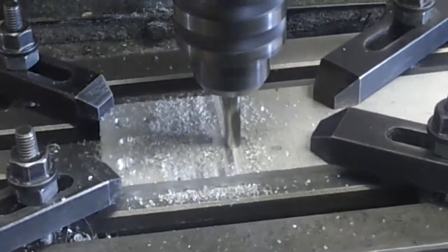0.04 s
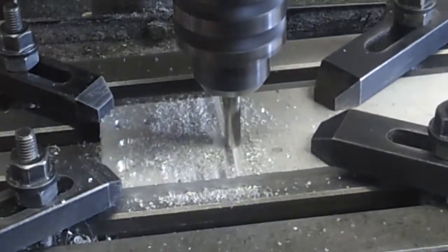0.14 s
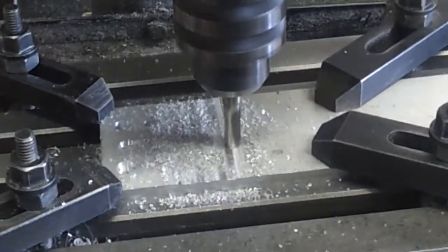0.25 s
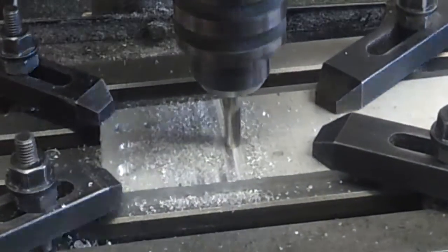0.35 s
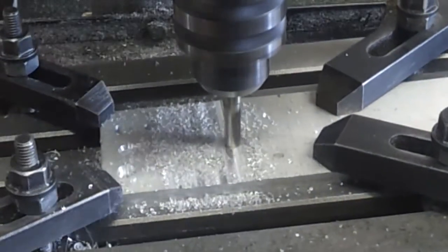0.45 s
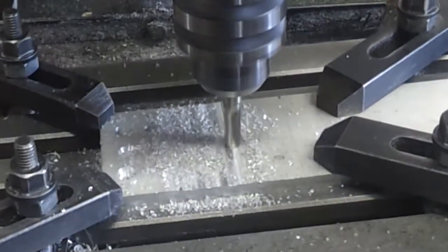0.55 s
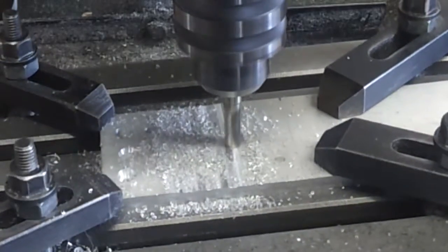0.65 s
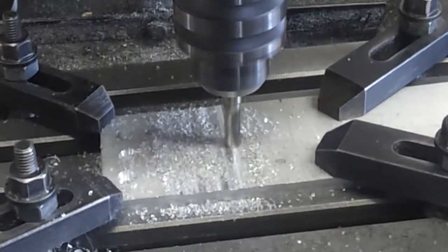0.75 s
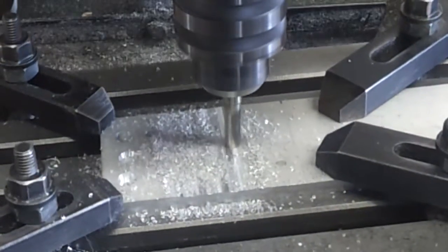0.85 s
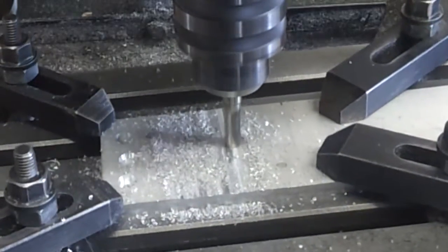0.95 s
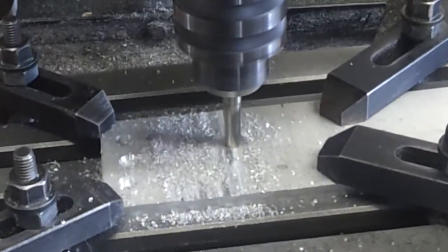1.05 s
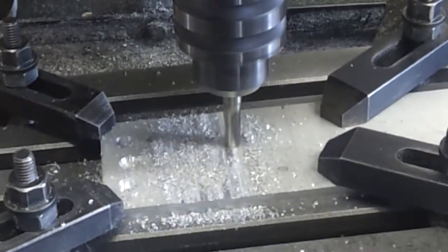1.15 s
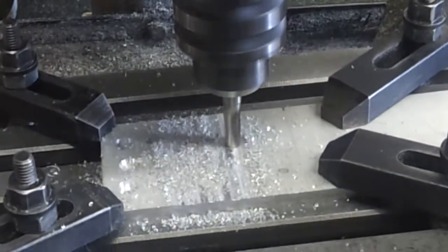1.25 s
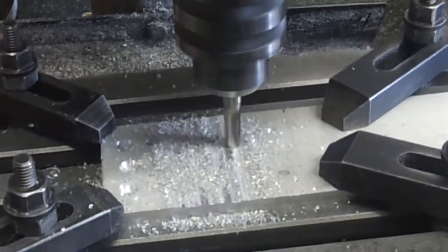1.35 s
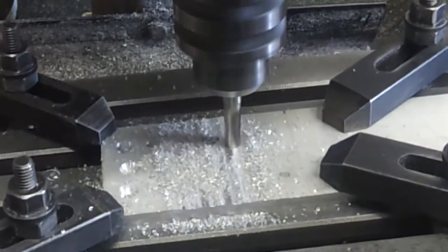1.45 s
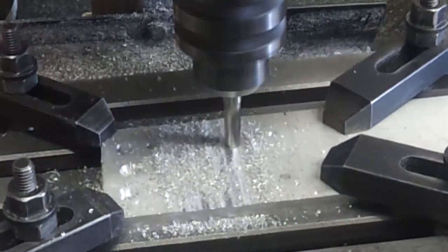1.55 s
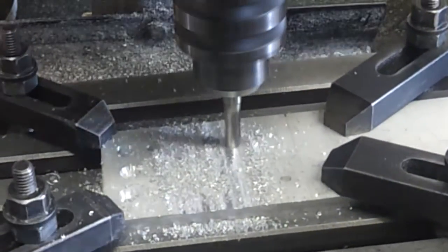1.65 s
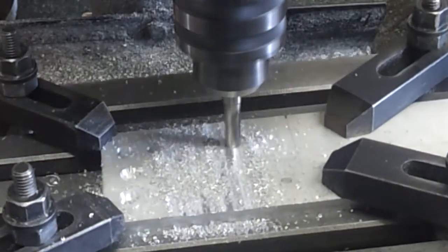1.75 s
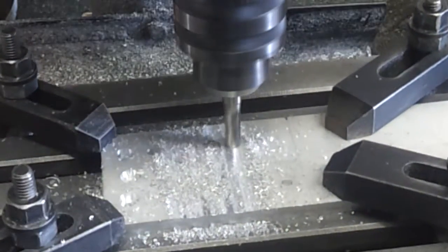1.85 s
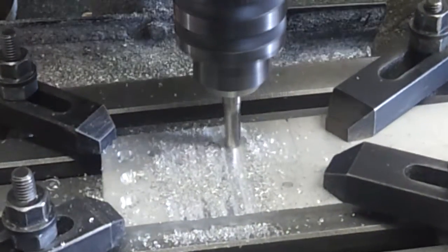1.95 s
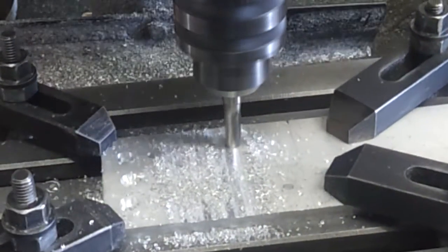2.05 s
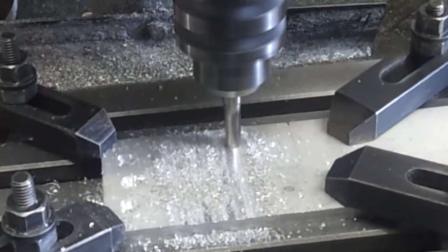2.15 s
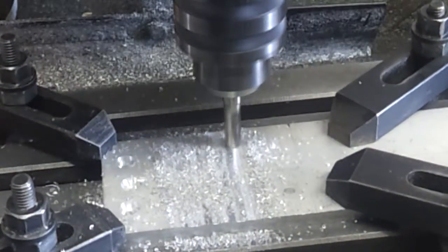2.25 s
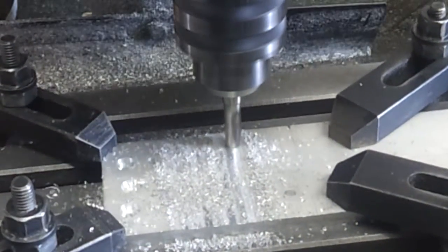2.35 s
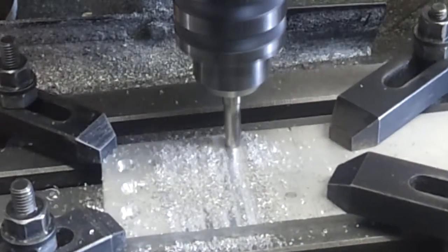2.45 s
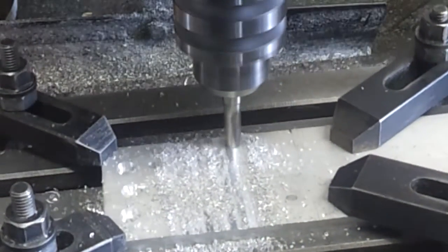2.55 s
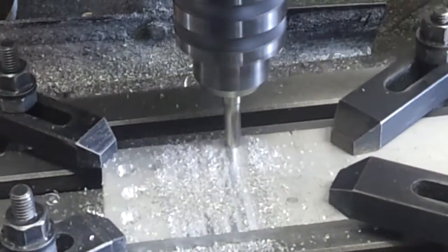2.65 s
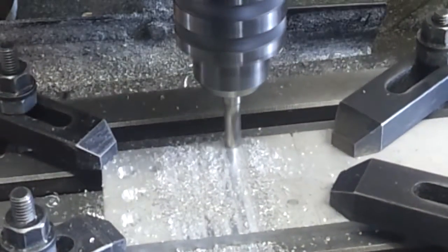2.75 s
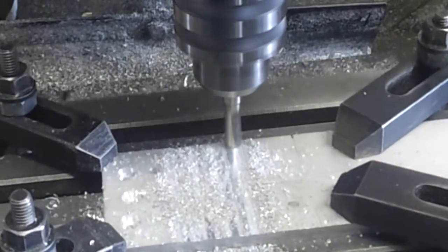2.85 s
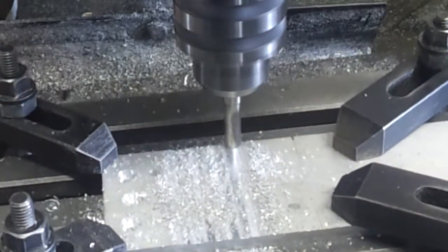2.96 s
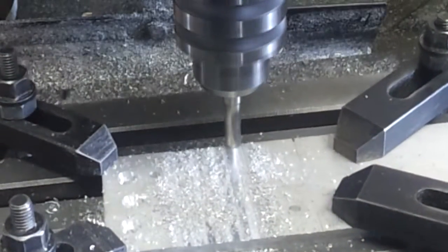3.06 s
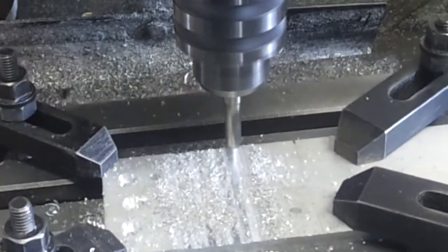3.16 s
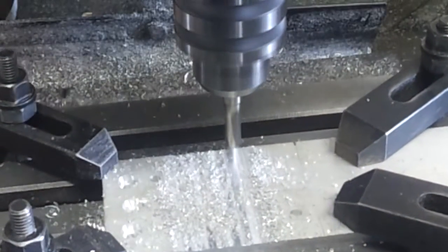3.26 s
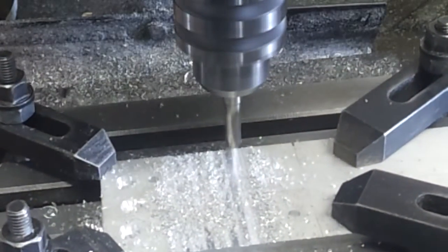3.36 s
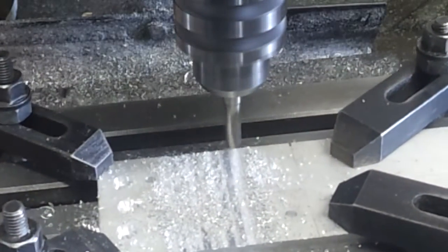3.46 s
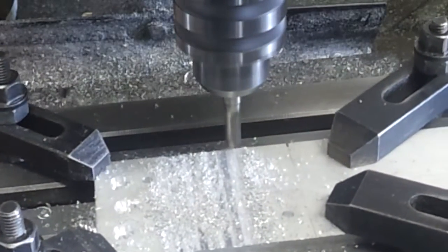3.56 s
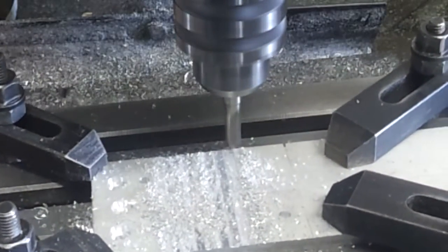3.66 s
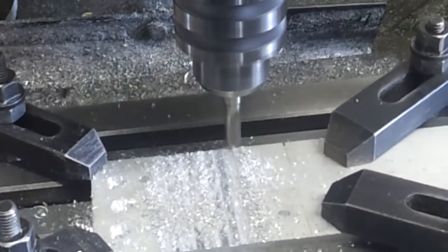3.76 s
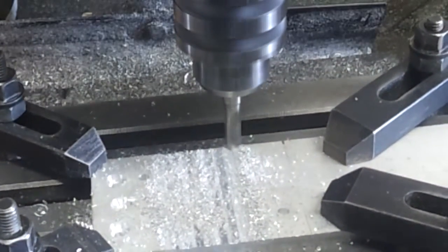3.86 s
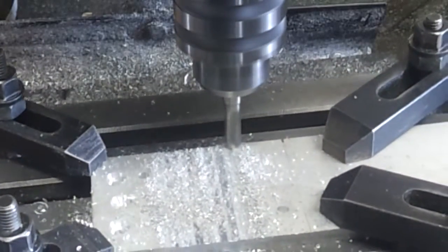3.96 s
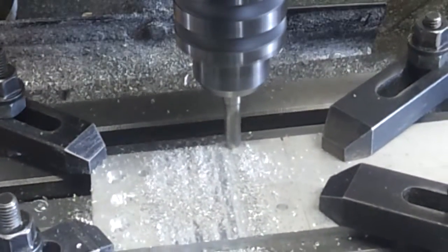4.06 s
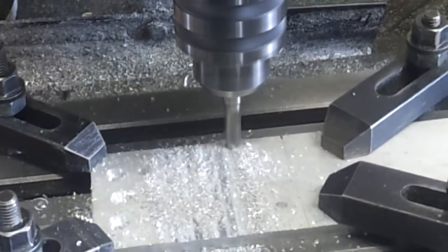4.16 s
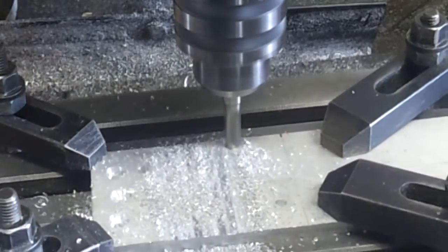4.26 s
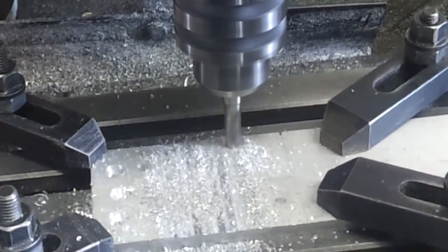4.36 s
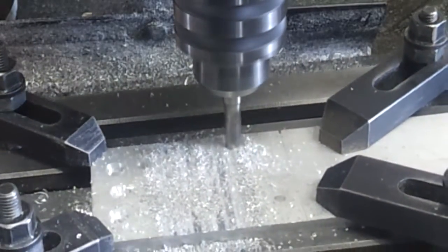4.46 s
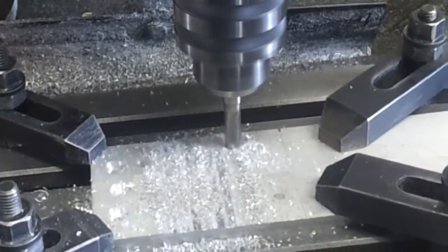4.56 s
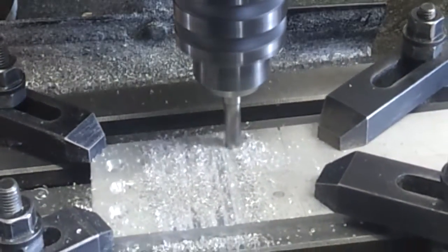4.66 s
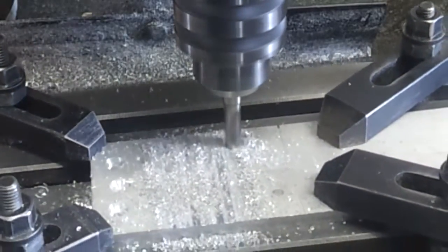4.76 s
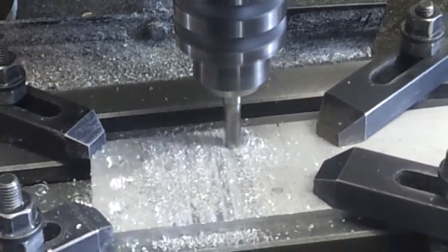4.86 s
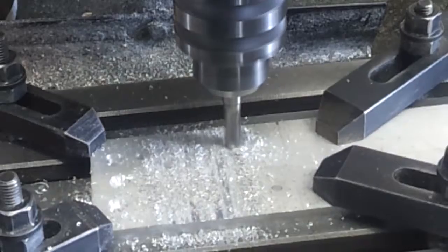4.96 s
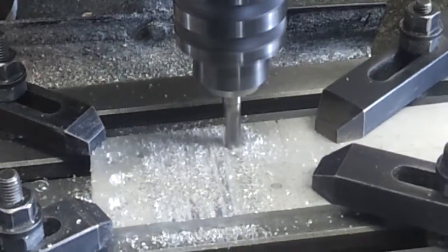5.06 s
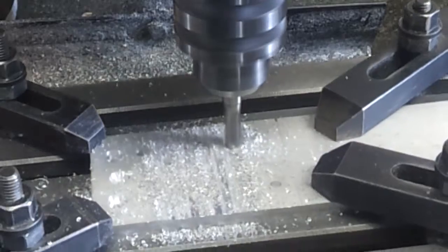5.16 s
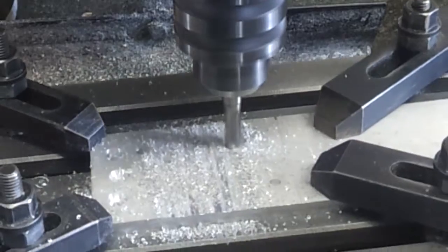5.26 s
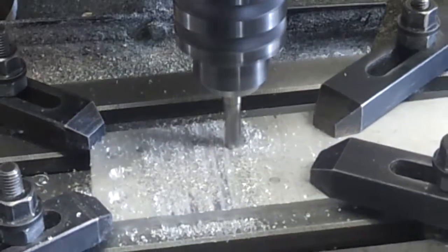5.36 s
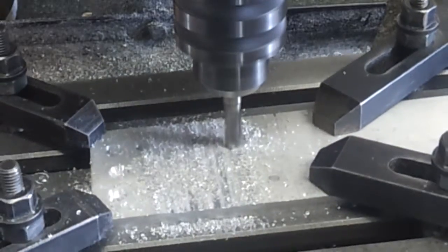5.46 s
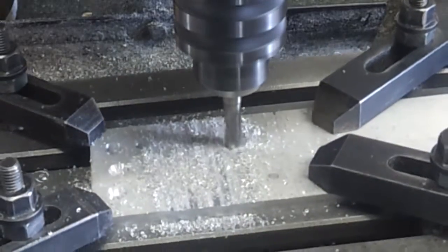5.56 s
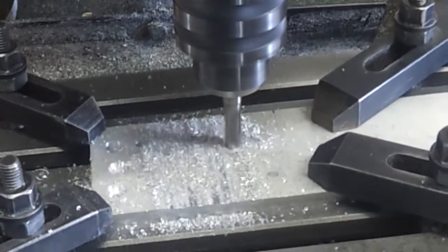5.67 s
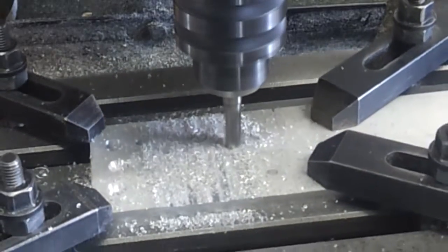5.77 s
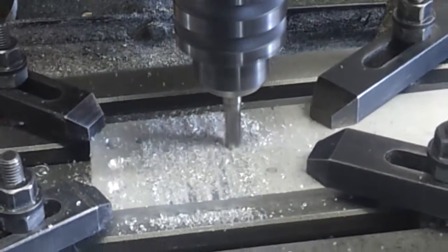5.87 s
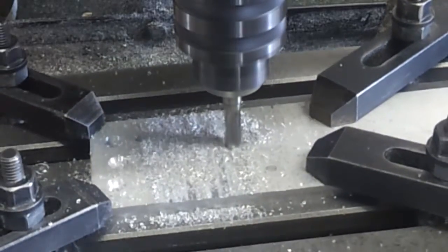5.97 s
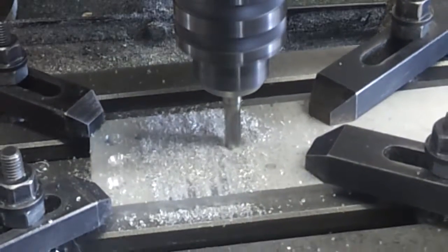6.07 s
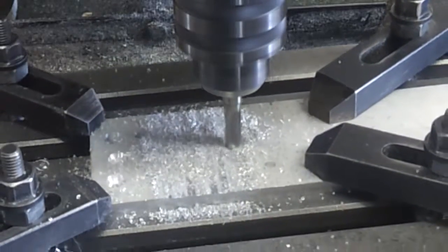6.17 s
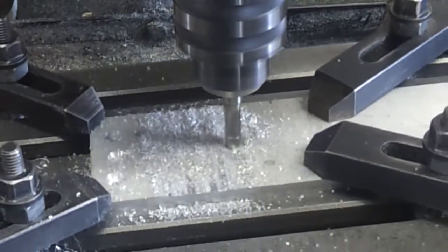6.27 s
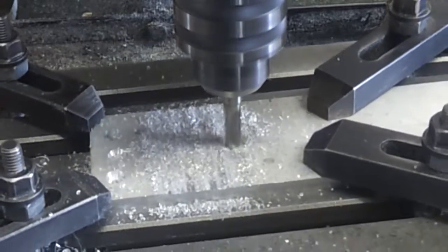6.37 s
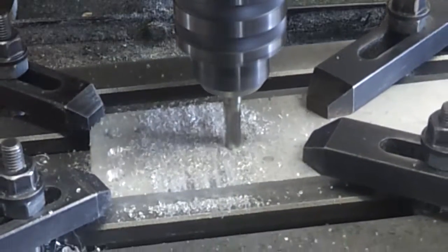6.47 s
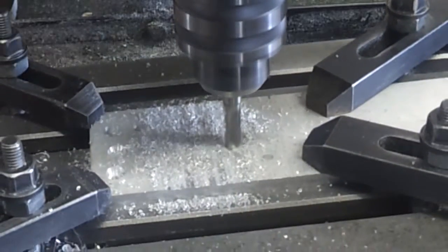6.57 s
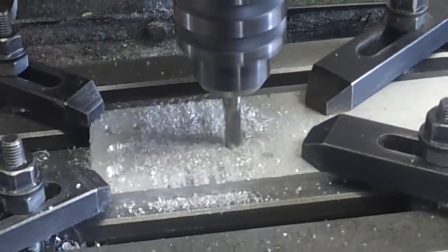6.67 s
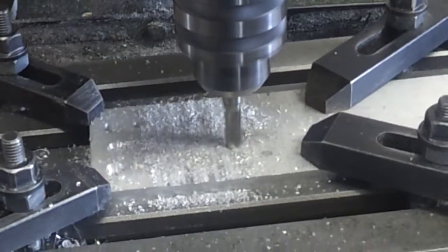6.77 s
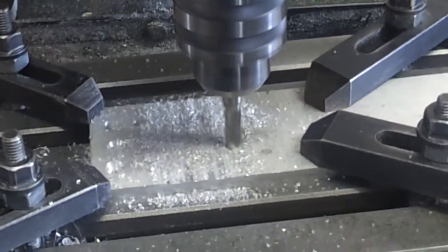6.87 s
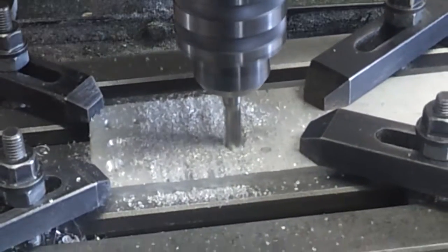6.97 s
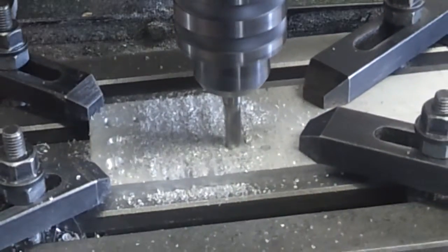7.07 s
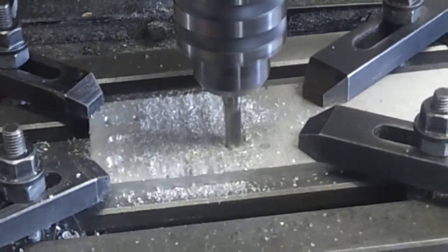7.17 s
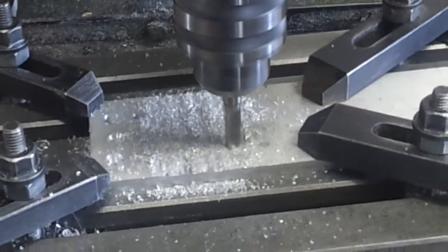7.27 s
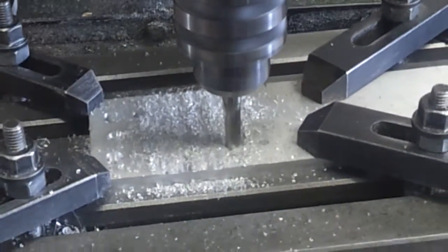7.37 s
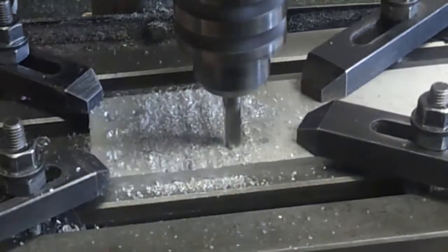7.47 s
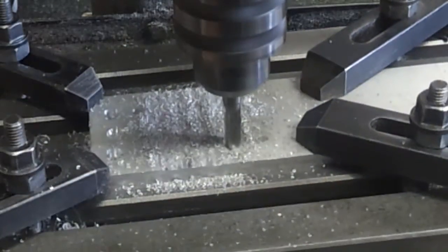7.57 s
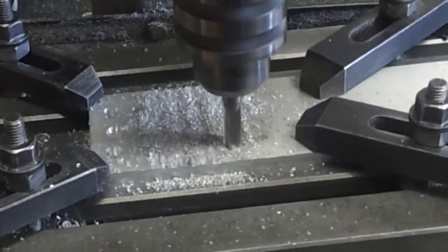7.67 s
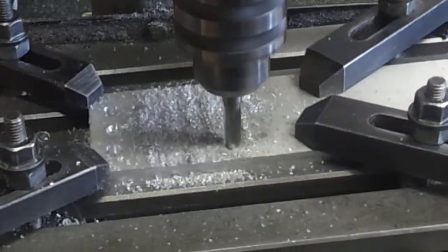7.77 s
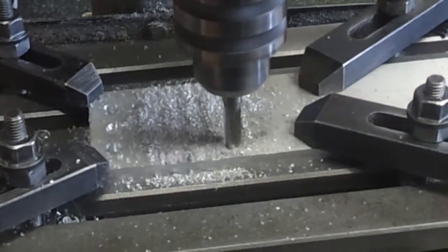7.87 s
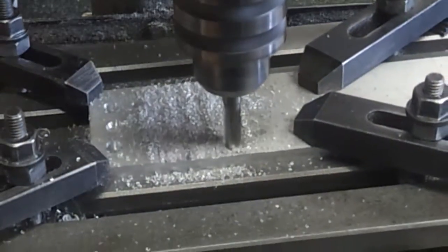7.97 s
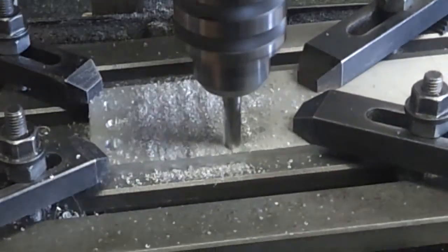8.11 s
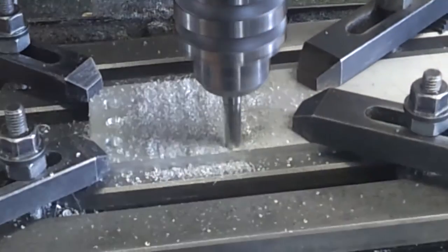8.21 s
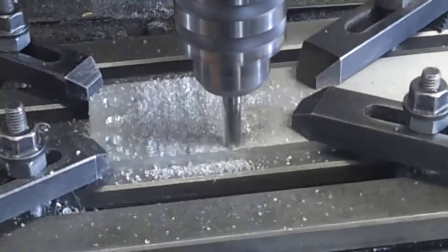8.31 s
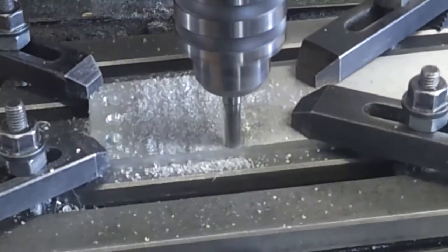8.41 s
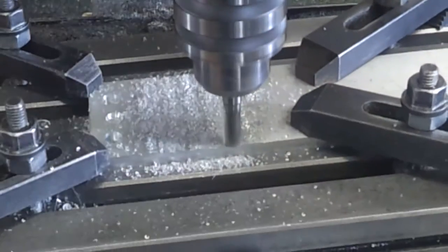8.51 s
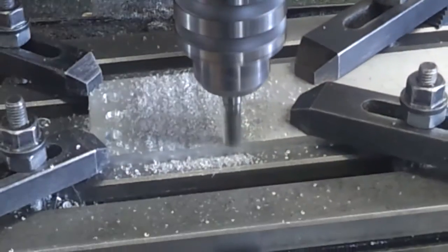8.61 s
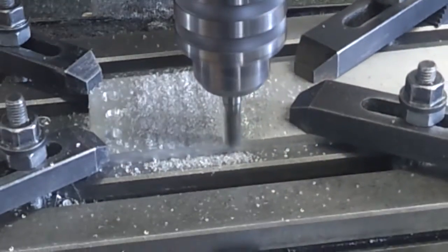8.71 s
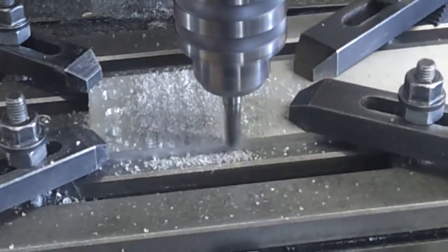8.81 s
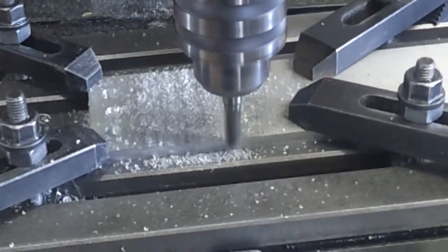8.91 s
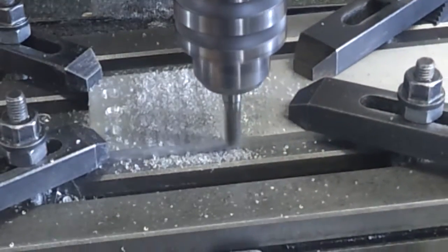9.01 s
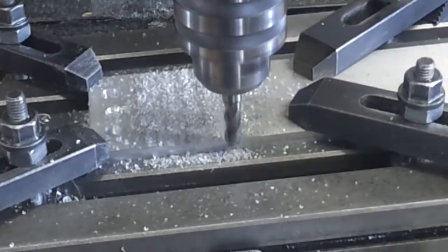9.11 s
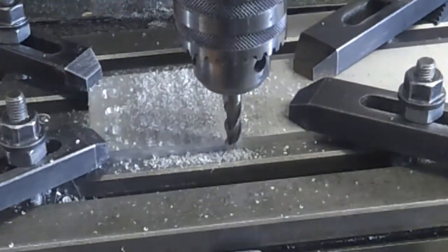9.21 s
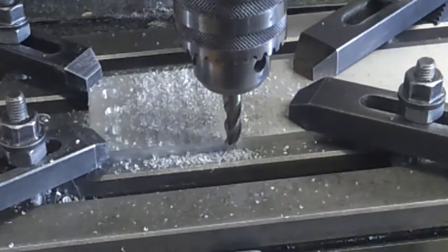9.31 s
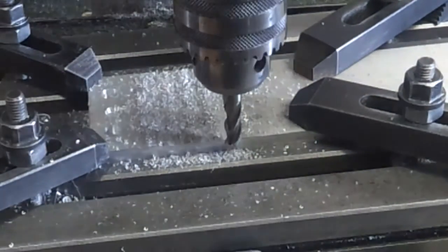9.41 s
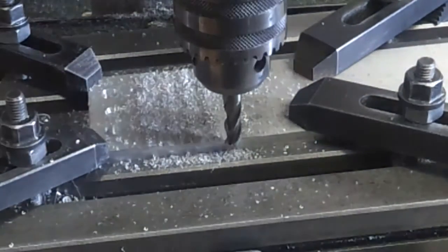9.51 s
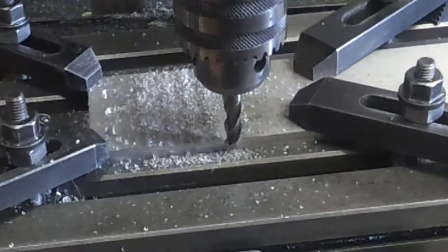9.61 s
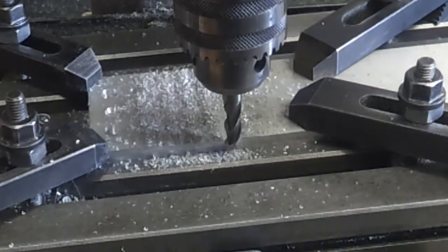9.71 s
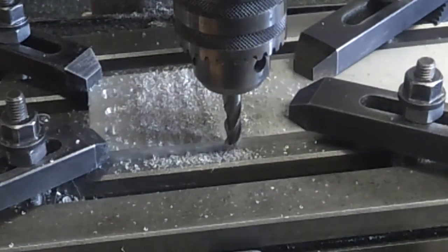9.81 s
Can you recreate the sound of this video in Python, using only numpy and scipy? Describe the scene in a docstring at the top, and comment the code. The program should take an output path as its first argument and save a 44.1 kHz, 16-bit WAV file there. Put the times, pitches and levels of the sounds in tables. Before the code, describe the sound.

Heard from close by, a spinning cutter grinds steadily through a metal plate, rattling the machine table and throwing off hissing chips. A ringing tone and a thinner, very high whine rise and ebb above it. After almost nine seconds the cutter leaves the metal with a few bright grazes. A brief silence follows, then the free spindle hisses and a single dull knock sounds.

```python
"""An end mill cuts a plate clamped to the table of a milling machine, close by.
Each spindle turn bites off chips that rattle the table and hiss, while two chatter tones whine.
The cutter runs out, the sound breaks off briefly, then the spindle hisses freely
and something knocks once."""
import sys
import numpy as np
from scipy import signal
from scipy.fft import rfft, irfft, next_fast_len
from scipy.io import wavfile
from scipy.ndimage import map_coordinates

SR = 44100
rng = np.random.default_rng(int(sys.argv[2]) if len(sys.argv) > 2 else 0)


def wrap_up_sound(samples):
    """Save the sound to the file named by the first command line argument, as 16-bit audio."""
    columns = np.atleast_2d(samples).T
    # keep every value between -1 and 1, then stretch to whole-number steps
    tamed = np.clip(columns, -1, 1)
    steps = np.round(tamed * 32767).astype(np.int16)
    wavfile.write(sys.argv[1], SR, steps)


N = 434385
TIME_S = np.arange(N) / SR
FFT_SIZE = next_fast_len(N + 16384)
FREQ_HZ = np.maximum(np.arange(FFT_SIZE // 2 + 1) * SR / FFT_SIZE, 1)
SPINDLE_HZ, CUT_END_S = 46.865, 8.83

# spectrum of table, clamps and plate: f/Hz, relative level/dB
BODY_SPECTRUM = [(22, -30), (50, -22.5), (95, -12), (150, -14), (280, -0.9), (600, -2), (1020, -8.5),
                 (1500, -10), (2200, -17), (2900, -9), (3800, -9.5), (4700, -18.5), (5900, -20)]
# passes through the metal: start/s, end/s
CUT_PASSES = [(-.1, 3.155), (3.59, 8.745)]


def undb(db):
    """Decibels to gain."""
    return 10 ** (np.asarray(db) / 20)


def unit_rms(x):
    """Scale to rms 1."""
    return x / np.sqrt(np.mean(x ** 2))


def gate(start_s, end_s, fade_s):
    """1 from start to end, with linear ramps."""
    return np.clip(np.minimum(TIME_S - start_s, end_s - TIME_S) / fade_s + .5, 0, 1)


def wander(rate_hz):
    """Smooth random curve, rms about 1."""
    return map_coordinates(rng.standard_normal(16384), [TIME_S * rate_hz], order=3, mode="wrap")


def pulses(times_s, peaks, sigma_s):
    """Sum of Gaussian force pulses."""
    force = np.zeros(N)
    for at_s, peak in zip(times_s, peaks):
        near = slice(*np.searchsorted(TIME_S, [at_s - 4 * sigma_s, at_s + 4 * sigma_s]))
        force[near] += peak * np.exp(-.5 * ((TIME_S[near] - at_s) / sigma_s) ** 2)
    return force


def response(spectrum, modes=()):
    """Gain over frequency: broad slope plus resonance peaks."""
    hz, db = np.transpose(spectrum)
    slope_db = np.interp(np.log(FREQ_HZ), np.log(hz), db)
    peaks_db = sum(lift_db / (1 + (2 * (FREQ_HZ - mode_hz) / width_hz) ** 2)
                   for mode_hz, width_hz, lift_db in modes)
    return undb(slope_db + peaks_db)


def band(low_hz, high_hz):
    """Band-pass gain, 8th-order edges."""
    return ((1 + (low_hz / FREQ_HZ) ** 16) * (1 + (FREQ_HZ / high_hz) ** 16)) ** -.5


def resonance(hz, width_hz):
    """Gain of one lightly damped mode."""
    return (1 + ((FREQ_HZ / hz - hz / FREQ_HZ) * hz / width_hz) ** 2) ** -.5


def excite(force, gain):
    """Noise with envelope force rings a minimum-phase filter of unit power."""
    cepstrum = irfft(np.log(unit_rms(gain) + 1e-5), FFT_SIZE)
    cepstrum[1:FFT_SIZE // 2] *= 2
    cepstrum[FFT_SIZE // 2 + 1:] = 0
    drive = rfft(force * rng.standard_normal(N), FFT_SIZE)
    return irfft(drive * np.exp(rfft(cepstrum)), FFT_SIZE)[:N]


def cut_gain(out_db, back_db, load_slope, decay_s=.022):
    """Gain of one part: follows feed direction and load, decays once the cutter runs out."""
    # cutting load, easing at the plate edges: t/s, level/dB
    load = [(0, 0.35), (2.5, -.3), (2.9, -3), (3.4, -3.5), (3.65, -0.5), (6.15, 1), (7.9, 0), (8.35, -3),
            (8.8, -3)]
    load_db = np.interp(TIME_S, *np.transpose(load))
    feed_reversed = gate(3.1, np.inf, fade_s=.8)
    engaged = np.exp(-np.maximum(TIME_S - CUT_END_S, 0) / decay_s)
    return engaged * undb(out_db + (back_db - out_db) * feed_reversed + load_slope * load_db)


def tone(hz, level_db, drift_hz, jitter_hz, flutter_db):
    """Self-excited vibration; chips nudge its pitch."""
    pitch_hz = hz + drift_hz * wander(14) + jitter_hz * wander(350)
    amplitude = np.sqrt(2) * undb(level_db + flutter_db * wander(70))
    return amplitude * np.sin(2 * np.pi * np.cumsum(pitch_hz) / SR)


def free_spindle():
    """Unloaded, the spindle hisses and the cutter whistles, throbbing once a turn."""
    # free running: start/s, end/s, hiss level/dB, whistle level/dB
    spells = [(3.165, 3.563, -34, -25), (8.762, 9.06, -28.5, -29), (9.197, 9.703, -24.5, -26.5),
              (9.698, 9.9, -22.5, -24.5)]
    # spindle hiss: f/Hz, relative level/dB
    hiss_spectrum = [(40, -46.5), (100, -51.5), (170, -13), (280, -5.5), (450, -10.5), (1500, -10),
                     (2900, -9.5), (5200, -15), (6500, -11), (9000, -6), (11800, 0.5), (14400, -1.5)]
    # spindle resonances: f/Hz, width/Hz, lift/dB
    spindle_modes = [(318, 110, 3), (2860, 200, 6.5), (3650, 280, 5.5), (8600, 350, 3.9), (10900, 166, 2)]
    # airy cutter whistle: f/Hz, relative level/dB
    whistle_spectrum = [(11500, -30), (12100, -14), (12400, -2), (12580, 1), (12750, -2.5), (13000, -3),
                        (13300, -14), (14000, -30)]
    hiss_force, whistle_force = sum(np.outer(undb(levels_db), gate(start_s, end_s, .012))
                                    for start_s, end_s, *levels_db in spells)
    throb = 1 + .14 * np.cos(2 * np.pi * SPINDLE_HZ * TIME_S)
    hiss = excite(hiss_force * undb(.33 * wander(30)), response(hiss_spectrum, spindle_modes))
    whistle = excite(whistle_force * throb, response(whistle_spectrum) * band(11000, 15000))
    return hiss + whistle


def knock():
    """Three quick blows in the machine merge into one dull knock."""
    # blows: t/s, level/dB, decay/s
    blows = [(9.678, -32.5, 0.034), (9.71, -15.5, 0.0091), (9.724, -25, 0.023)]
    # struck machine: f/Hz, relative level/dB
    spectrum = [(30, -39), (90, -26), (220, -10.5), (600, -9), (720, -10), (900, -4), (1050, -9),
                (1200, -11.5), (1900, -22), (2900, -18.5), (4000, -28), (6500, -37), (14000, -44)]
    force = sum(undb(db) * (TIME_S > at_s) * np.exp(-np.abs(TIME_S - at_s) / decay_s)
                for at_s, db, decay_s in blows)
    return excite(force, response(spectrum) * band(70, 16000))


def high_chatter():
    """High whine that builds up in spells over a quiet floor."""
    # whine spells: start/s, end/s, level/dB
    spells = [(-.3, .7, -26.5), (1.123, 1.96, -23.5), (2.4, 4.3, -23), (4.56, 5.7, -21.1),
              (6.196, 7.56, -24), (8.147, 9.1, -21.5)]
    swells = sum(undb(db) * gate(start_s, end_s, fade_s=.45) for start_s, end_s, db in spells)
    envelope = np.maximum(swells, undb(-33.5)) * gate(-1, 8.783, .015)
    return envelope * tone(11176, .6 * wander(8), drift_hz=1.6, jitter_hz=11, flutter_db=1.4)


def low_chatter():
    """Sings only in the metal, swelling and ebbing with travel; heavy load damps it."""
    peak_s, period_s = 1.77, 3.22
    swell_db = 3 * np.cos(2 * np.pi * (TIME_S - peak_s) / period_s)
    in_metal = sum(gate(start_s, end_s, .015) for start_s, end_s in CUT_PASSES)
    # louder means steadier pitch
    chatter = tone(3025, swell_db, drift_hz=2.2, jitter_hz=13 / undb(swell_db), flutter_db=1.1)
    return chatter * cut_gain(out_db=-28.4, back_db=-28.5, load_slope=-.5) * in_metal


def clamp_hum():
    """The cut keeps a clamp humming, rough and unsteady."""
    hum = tone(699, 0, drift_hz=7, jitter_hz=34.04, flutter_db=3.5)
    return hum * cut_gain(out_db=-33, back_db=-29.5, load_slope=0, decay_s=.056)


def flute_bites():
    """The proudest flute bites once a turn, unevenly; the opposite one takes a thinner chip."""
    jitter_s, scatter_db, sigma_s = .0021, 2.5, .0041
    turns_s = np.arange(int(N / SR * SPINDLE_HZ)) / SPINDLE_HZ
    spread = np.clip(rng.standard_normal((len(turns_s), 4)), -2, 2).T
    proud_s = turns_s - .001 + jitter_s * spread[0]
    opposite_s = turns_s + .5 / SPINDLE_HZ + jitter_s * spread[2]
    proud = pulses(proud_s, undb(scatter_db * spread[1]), sigma_s)
    opposite = pulses(opposite_s, undb(scatter_db * spread[3]), sigma_s)
    return unit_rms(proud + .25 * opposite)


def cutting():
    """Bites and steady rubbing, broken into tiny fractures, drive table, plate and cutter."""
    # thick chips tearing off: t/s, relative thump level/dB, relative crack level/dB
    heavy_bites = [(0.083, -16, -18.5), (0.66, -16.5, -18.5), (1.043, -12.5, -24), (1.213, -14, -16.5),
                   (2.067, -11, -22), (3.498, -12, -19.5), (3.562, -17.5, -16.5), (3.686, -14.5, -16),
                   (4.052, -17, -14.5), (4.42, -16, -15.5), (4.673, -15, -16.5), (5.288, -18, -18.5),
                   (5.398, -20.5, -15.5), (5.525, -10, -17.5), (5.633, -13.5, -14.5), (5.958, -15.5, -15.5),
                   (6.104, -11, -11.5), (6.243, -16, -17.5), (6.507, -15, -15), (6.66, -12.5, -17.5),
                   (6.958, -13.5, -15.5), (7.101, -10, -14.5)]
    # bright grazes as the cutter leaves the plate: t/s, relative level/dB
    exit_grazes = [(8.767, -21), (8.846, -14), (8.894, -30.5), (8.933, -20), (9.024, -31)]
    # resonances of table, clamps and plate: f/Hz, width/Hz, lift/dB
    body_modes = [(873.5, 99, 13.5), (933, 46, 10), (1116, 57, 4), (1299, 94, 9.5), (1377, 77, 4.5),
                  (1557, 146, 9), (1748, 52, 5), (2021, 140, 7), (2400, 120, 3), (3447, 72, 4),
                  (4050, 53, 0), (4255, 27, 9), (4640, 240, 7), (5365, 85, 8)]
    # cutting edges and chips: f/Hz, relative level/dB
    edge_spectrum = [(4500, -45), (5900, -17), (6700, -17), (8000, -3.5), (9000, -0.5), (10400, 1),
                     (11500, 3.5), (12600, 3.5), (14400, 0.5)]
    # their resonances: f/Hz, width/Hz, lift/dB
    edge_modes = [(6330, 114, 16.7), (7010, 180, 12.4), (7740, 50, 5.7), (9400, 70, 4.4), (9700, 220, 4.4),
                  (10860, 200, 9.4)]
    body, edge = response(BODY_SPECTRUM, body_modes), response(edge_spectrum, edge_modes)
    bites = flute_bites()
    fractures = unit_rms(undb(.71 * wander(700)))
    heavy_s, thump_db, crack_db = np.transpose(heavy_bites)
    thump = pulses(heavy_s, undb(thump_db), sigma_s=.003)
    crack = pulses(heavy_s, undb(crack_db), sigma_s=.003)
    graze_s, graze_db = np.transpose(exit_grazes)
    graze = pulses(graze_s, undb(graze_db), sigma_s=.0045)

    def part(gain, rub, heavy, **levels):
        """One band of the cut; a stronger heavy bite or graze replaces the ordinary bite."""
        ordinary = cut_gain(**levels) * unit_rms(bites + rub)
        return excite(np.maximum(ordinary, heavy) * fractures, gain)

    thud = part(body * band(18, 508), rub=1.4, heavy=.38 * thump + .12 * graze,
                out_db=-26, back_db=-28, load_slope=.49)
    plate = part(body * band(553, 1032), rub=.99, heavy=thump + .22 * graze,
                 out_db=-21.5, back_db=-22.7, load_slope=.56)
    clack = part(body * band(1082, 1864), rub=.5, heavy=crack + .28 * graze,
                 out_db=-26.5, back_db=-26.5, load_slope=1.2)
    crunch = part(body * band(1936, 5220), rub=.7, heavy=.67 * crack + .4 * graze,
                  out_db=-28, back_db=-28.5, load_slope=.77)
    hiss = part(edge * band(5700, 17100), rub=.89, heavy=.33 * crack + graze,
                out_db=-26.5, back_db=-26.2, load_slope=0)
    bending_modes = (resonance(9360, 45) + resonance(9545, 45)) * band(8500, 10400)
    first_pass = gate(*CUT_PASSES[0], .03)
    cutter_ring = excite(undb(-38.5) * unit_rms(bites + 1.4) * fractures * first_pass, bending_modes)
    return thud + plate + clack + crunch + hiss + cutter_ring


def scene():
    """Sources centred; very faint broadband hiss, opposite in left and right, stops near 8.8 s."""
    mid = cutting() + clamp_hum() + low_chatter() + high_chatter() + free_spindle() + knock()
    side = excite(undb(-62) * gate(-1, CUT_END_S, .05), response(BODY_SPECTRUM) ** .1 * band(20, 14000))
    return np.array([mid + side, mid - side])


def record(dry):
    """Soft clipping, a brief dropout, steep low-pass."""
    ceiling, cutoff_hz = .85, 14560
    clipped = dry / (1 + (dry / ceiling) ** 6) ** (1 / 6)
    dropout = gate(9.043, 9.226, .0055)
    lowpass = signal.ellip(14, .1, 80, cutoff_hz, fs=SR, output="sos")
    return signal.sosfilt(lowpass, clipped * (1 - dropout))


dry = scene()
out = record(dry)
wrap_up_sound(out)
```